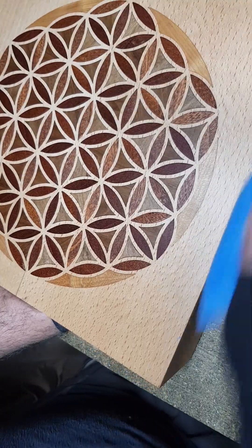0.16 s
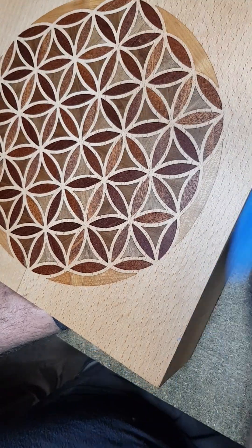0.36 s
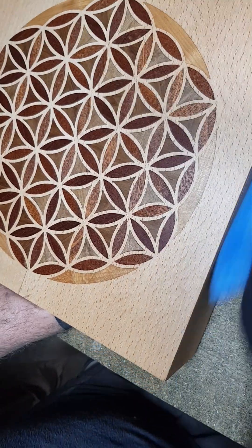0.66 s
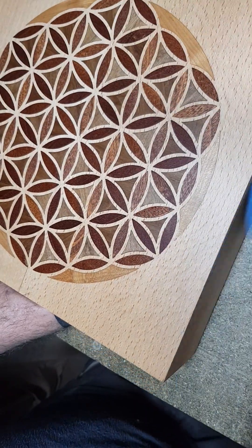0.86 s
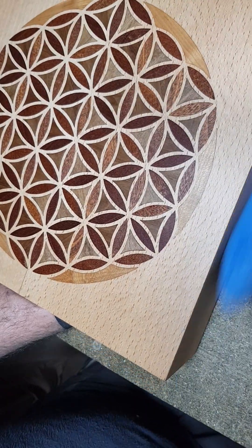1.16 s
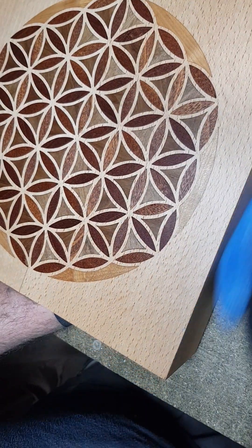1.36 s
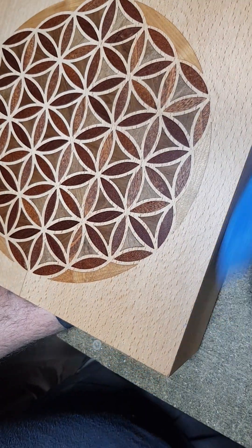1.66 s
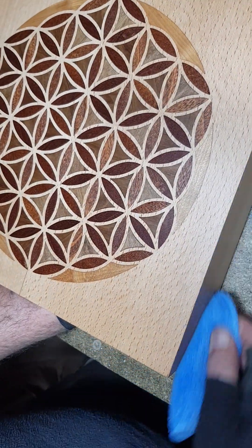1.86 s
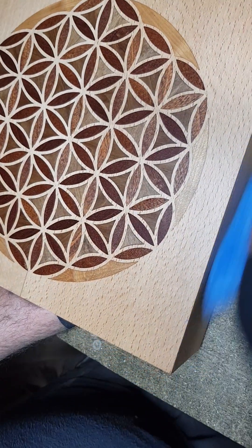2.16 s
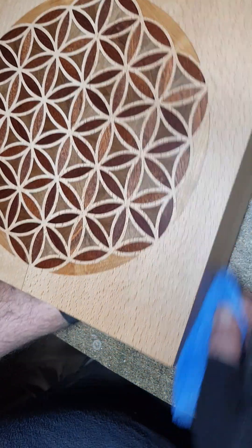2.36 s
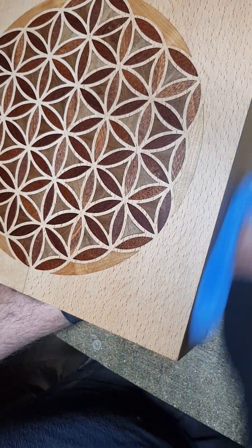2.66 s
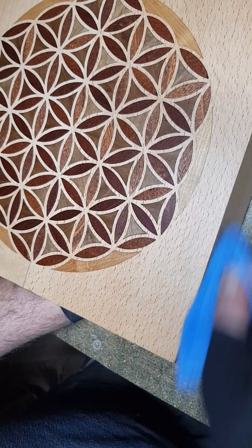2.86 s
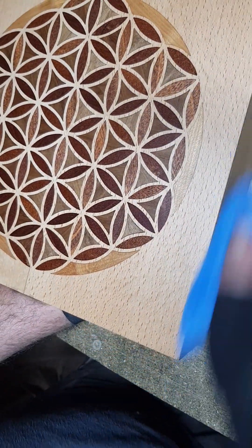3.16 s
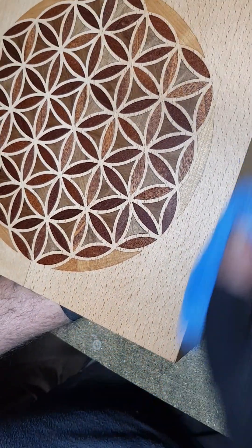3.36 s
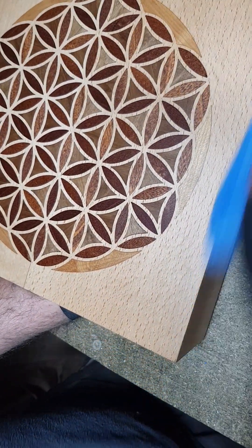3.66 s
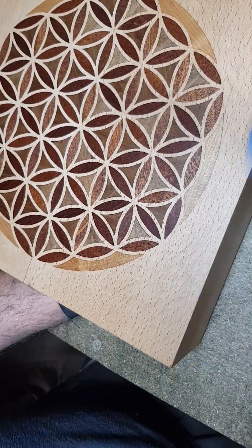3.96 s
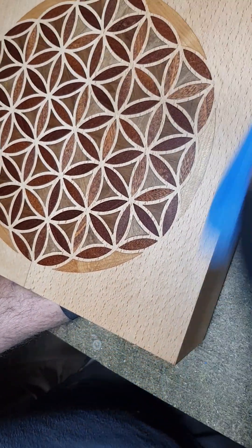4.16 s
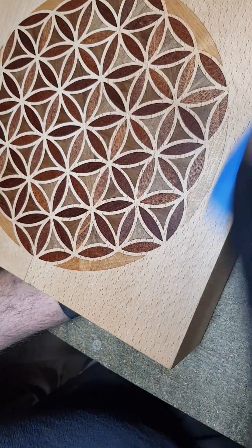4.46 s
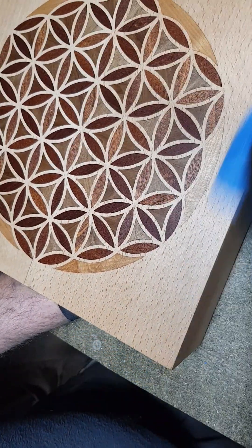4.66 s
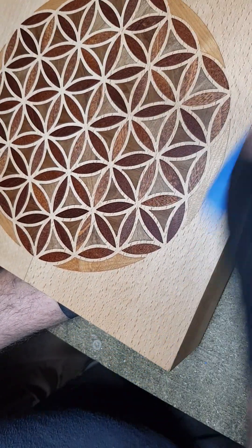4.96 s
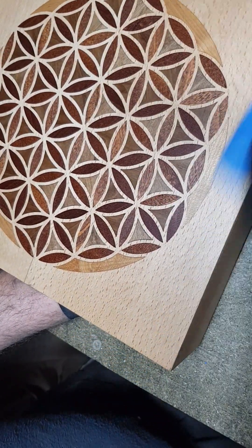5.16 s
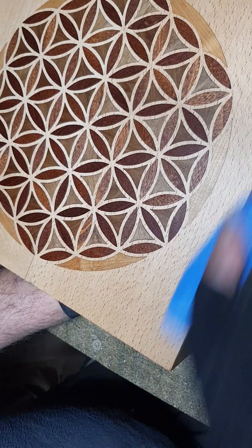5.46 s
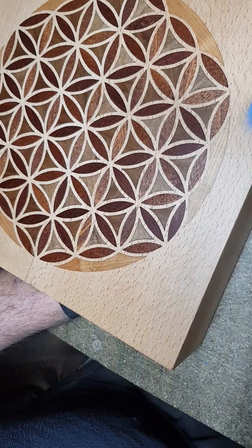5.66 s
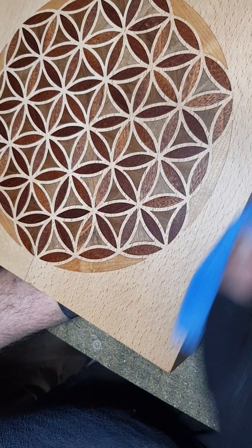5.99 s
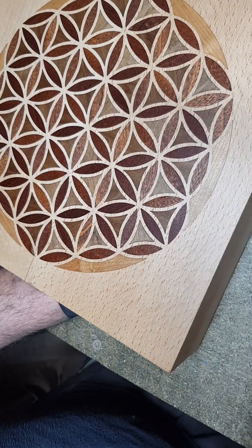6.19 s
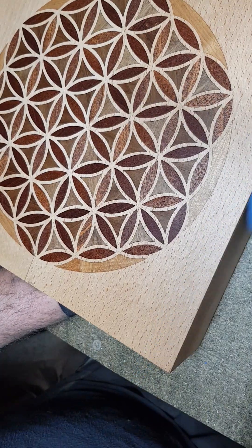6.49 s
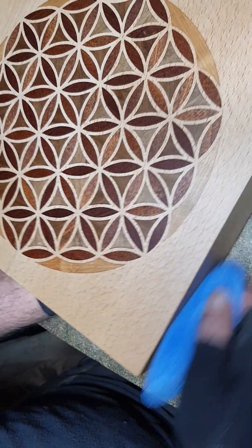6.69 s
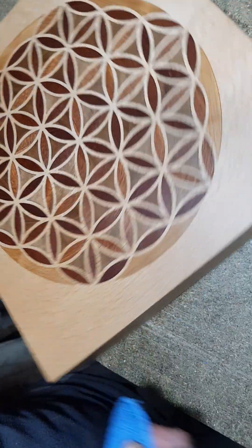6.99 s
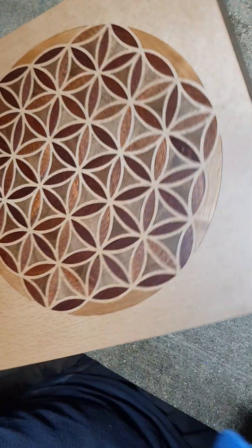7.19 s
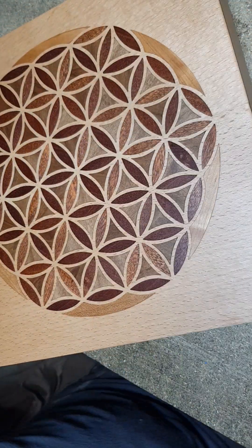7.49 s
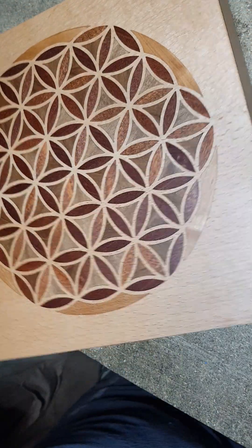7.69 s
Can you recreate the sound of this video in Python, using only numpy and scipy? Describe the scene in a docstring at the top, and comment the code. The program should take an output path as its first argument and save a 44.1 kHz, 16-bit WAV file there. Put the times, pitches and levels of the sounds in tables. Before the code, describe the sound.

Close, dry rubbing of fabric on wood, about four quick strokes a second, the box bumping lightly before dragging round on its support.

```python
"""A cloth hisses back and forth along the oiled side of a hand-held wooden box, about four strokes a second.
The hiss is dense random friction slips; the wood murmurs under it, as slips ringing panel modes.
The box bumps on its support as short push-and-rebound pulses, with clacks that ring the panels.
Thin whistles come and go; at the end coarser slips drag the box round with a dull scrape.
A small, dry workshop adds sparse reflections; the microphones are close."""
import sys
import numpy as np
from scipy import signal
from scipy.fft import rfft, irfft, next_fast_len
from scipy.io import wavfile
from scipy.ndimage import uniform_filter1d

SR = 44100
rng = np.random.default_rng(int(sys.argv[2]) if len(sys.argv) > 2 else 0)


def master(y):
    """Save y as 16-bit WAV."""
    cut = np.clip(np.atleast_2d(y).T, -1, 1)
    pcm = np.round(cut * 32767)  # scale
    wavfile.write(sys.argv[1], SR, pcm.astype(np.int16))


N = 345479
TIME = np.arange(N) / SR


def amp(db):
    """Decibels to gain."""
    return 10 ** (np.asarray(db) / 20)


def unit(x):
    """Scales to rms 1."""
    return x / np.sqrt(np.mean(x ** 2) + 1e-20)


def curve(rows, axis=1):
    """One column of a table, joined by straight lines in time."""
    rows = np.array(rows)
    return np.interp(TIME, rows[:, 0], rows[:, axis])


def at_hz(points, hz):
    """Reads a table on a log-frequency axis."""
    table_hz, value = np.transpose(points)
    return np.interp(np.log(hz + 1), np.log(table_hz), value)


def colour(x, points):
    """Gives x a spectrum, at rms 1."""
    size = next_fast_len(N)
    gain = amp(at_hz(points, np.fft.rfftfreq(size, 1 / SR)))
    return unit(irfft(rfft(x, size) * gain, size)[..., :N])


def butter(x, order, cutoff_hz, kind="low"):
    """Butterworth filter."""
    return signal.sosfilt(signal.butter(order, cutoff_hz, kind, fs=SR, output="sos"), x)


def wander(rate_hz):
    """Smooth random drift of rms 1."""
    lowpass = np.exp(-(np.fft.rfftfreq(N, 1 / SR) / rate_hz) ** 2)
    return unit(irfft(rfft(rng.standard_normal(N)) * lowpass, N))


def swell(s, rise_s, fall_s):
    """A smooth rise and fall around one moment."""
    width_s = np.where(TIME < s, rise_s, fall_s)
    return np.exp(-.5 * ((TIME - s) / width_s) ** 2)


def slips(per_s, spread_db):
    """Tiny releases of friction, random in time, sign and size; rms 1."""
    size = amp(spread_db * np.minimum(rng.exponential(1, N), 4.5))
    happens = rng.random(N) < per_s / SR
    return unit(rng.standard_normal(N) * size * happens)


def pair(make, same):
    """Two microphones share part of a source; same is the shared power fraction."""
    same = np.clip(same, 0, 1)
    shared = make()
    separate = np.array([make(), make()])
    return np.sqrt(same) * shared + np.sqrt(1 - same) * separate


def noise():
    """White noise."""
    return rng.standard_normal(N)


def through(x, response):
    """Convolves each channel with its response."""
    return signal.fftconvolve(np.atleast_2d(x), np.atleast_2d(response), axes=1)[:, :N]


def ring(modes, skew=0):
    """Impulse response of decaying modes, energy 1; skew turns the phase of the higher ones."""
    t = np.arange(SR // 3) / SR
    h = np.zeros(len(t))
    for k, (hz, db, t60) in enumerate(modes):
        phase = skew * k * (-1) ** k
        h += amp(db - 60 * t / t60) * np.sin(2 * np.pi * hz * t + phase)
    return h / np.linalg.norm(h)


def mottle(x, patch_db):
    """The contact patch keeps changing shape, so neighbouring bands swell and fade."""
    z = signal.stft(x, SR, nperseg=1024)[2]
    patches = rng.standard_normal(z.shape[1:])
    for axis in (0, 1):
        patches = uniform_filter1d(patches, size=7, axis=axis)
    return unit(signal.istft(z * amp(patch_db * unit(patches)), SR, nperseg=1024)[1][:, :N])


# room air spectrum: freq_hz, relative_db
AIR_SPECTRUM = [(20, -18), (80, -2), (300, -27), (1400, -29.5), (16000, -57.5)]


def room_air():
    """Faint room rumble: shaped noise, nearly identical in both microphones."""
    return amp(-53.0) * colour(pair(noise, 0.95), AIR_SPECTRUM)


# workshop reverberation: freq_hz, t60_s
ROOM_DECAY = [(100, 0.088), (1000, 0.075), (15000, 0.029)]


def workshop(x):
    """Sparse reflections, different on each side, the treble dying first."""
    taps = rng.standard_normal((2, SR // 2)) * (rng.random((2, SR // 2)) < 2500 / SR)
    taps[:, :SR // 250] = 0  # 4 ms before the first reflection
    hz, t, z = signal.stft(taps, SR, nperseg=256)
    decay_db = -60 * t / at_hz(ROOM_DECAY, hz)[:, None]
    tail = signal.istft(z * amp(decay_db), SR, nperseg=256)[1]
    return through(x, tail / np.linalg.norm(tail[0]))


# box sway modes on the support: freq_hz, relative_db, t60_s
SWAY_MODES = [(85, 2.5, 0.61), (126.2, 8, 0.23), (258.6, 4.5, 0.092), (327, -8, 0.033)]


def sway(x):
    """The whole box rocks on its support."""
    return through(x, ring(SWAY_MODES))


# wooden panel modes: freq_hz, relative_db, t60_s
WOOD_MODES = [(450, 1, 0.15), (564, 8, 0.023), (682, 12.5, 0.018), (998, 9, 0.013), (1196, -2, 0.051),
              (1527, 6, 0.031), (1680, 9, 0.021), (1908, 8.5, 0.02), (2325, 8, 0.03), (2804, 10.5, 0.021),
              (3466, 11.5, 0.012)]


def ring_panels(x):
    """The wood rings; each microphone sees its higher modes from another angle."""
    return through(x, [ring(WOOD_MODES, skew=-0.18), ring(WOOD_MODES, skew=0.1)])


# drag force of the box on its support: time_s, relative_db
DRAG_FORCE = [(6.5, -74), (6.63, -45.5), (6.77, -42), (6.85, -37), (7.01, -35.5), (7.08, -30), (7.2, -31.5),
              (7.35, -48), (7.68, -52), (7.825, -32)]


def drag_force():
    """How hard the box scrapes over its support; zero before the first row."""
    return amp(curve(DRAG_FORCE)) * (TIME > DRAG_FORCE[0][0])


# low friction rumble, used by drag and groans: freq_hz, relative_db
GROAN_SPECTRUM = [(35, -14), (85, 12), (290, 7.5), (380, -14.5), (700, -2), (2000, -52)]
# scrape of box on support: freq_hz, relative_db
SCRAPE_SPECTRUM = [(150, -24), (300, 5.5), (690, -2), (860, -9.5), (1200, 1.5), (1600, -0.5), (2050, -7.5),
                   (4500, -24.5), (9000, -39)]


def drag():
    """Box scrapes over its support in coarse slips; ring, rumble and scratch grow as its weight bears down."""
    level = drag_force()
    weight = level / level.max()
    judder = pair(lambda: slips(2200, 1.1), 0.49)
    scrape = colour(judder, SCRAPE_SPECTRUM) + amp(1.5) * np.sqrt(weight) * unit(ring_panels(judder))
    scratch = unit(butter(judder, 2, [2600, 5600], "bandpass"))
    rumble = colour(pair(lambda: slips(900, 0.58), 1.0), GROAN_SPECTRUM)
    sliding = level * (amp(-5.5) * scrape + amp(-16.5) * weight * scratch)
    return (sliding + amp(-29.5) * weight ** 1.23 * rumble) * amp([[.9], [-.9]])


# bumps on the support: time_s, thud_relative_db, thud_pitch_hz, clack_relative_db
BUMP_EVENTS = [(0.091, -28, 182, -61), (0.48, -29, 168, -36), (0.536, -31.5, 318, -53),
               (0.57, -28.5, 147, -61), (0.821, -32, 142, -67), (1.025, -31, 150, -57),
               (1.061, -31, 119, -70), (1.548, -36, 302, -36), (1.611, -33, 160, -49),
               (1.717, -37, 278, -39), (1.902, -36.5, 283, -51), (2.091, -25.5, 143, -44),
               (2.143, -27.5, 133, -60), (2.414, -28.5, 280, -31.5), (2.464, -30.5, 169, -54),
               (2.603, -32.5, 285, -56), (2.838, -35.5, 252, -44), (2.889, -34.5, 234, -45),
               (3.072, -24.5, 380, -30), (3.077, -26.5, 268, -42), (3.601, -28.5, 183, -42),
               (3.858, -26, 116, -40), (4.112, -35, 143, -41), (4.218, -34, 300, -48),
               (4.373, -29.5, 127, -35), (4.607, -35, 240, -39), (4.742, -34, 250, -57),
               (4.884, -30.5, 105, -45), (4.913, -28.5, 200, -60), (5.114, -29, 483, -29),
               (5.149, -30.5, 106, -64), (5.262, -33, 260, -47), (5.448, -33, 210, -52),
               (5.666, -29.5, 186, -42), (5.818, -34, 255, -58), (5.965, -28, 151, -44),
               (6.579, -32, 238, -33.5), (6.584, -23, 162, -61), (7.513, -34.5, 91.5, -62),
               (7.612, -27, 124, -64), (7.824, -18.5, 203, -50)]


def chatter(body_db=-17):
    """After each bump the box shuffles on its support, which gives the thud a woody body."""
    shuffles = [amp(thud_db) * swell(s, 0.005, 0.028) for s, thud_db, hz, clack_db in BUMP_EVENTS]
    body_spectrum = [(60, -23), (140, -1), (290, 5), (380, -7), (700, -11), (1500, -17.5), (5000, -48)]
    body = colour(pair(lambda: slips(3000, 0.59), 0.8), body_spectrum)
    return amp(body_db) * np.max(shuffles, axis=0) * body * amp([[2], [-2]])


def bumps(rattle_s=0.013):
    """Each bump is one push and rebound that sets the box swaying; bare wood adds a short clack."""
    thuds, clacks = np.zeros(N), np.zeros(N)
    t = np.arange(SR // 20) / SR
    fade = np.exp(-t / rattle_s)
    for s, thud_db, hz, clack_db in BUMP_EVENTS:
        start = round(s * SR)
        span = slice(max(start - len(t), 0), start + len(t))
        u = np.pi * hz * (TIME[span] - s)
        thuds[span] += amp(thud_db) * (1 - 2 * u ** 2) * np.exp(-u ** 2)
        # the contact chatters for a few milliseconds: random phases, flat spectrum
        phase = np.angle(rfft(fade * rng.standard_normal(len(t))))
        contact = fade * irfft(np.exp(1j * phase), len(t))
        # the slower the push, the duller its clack
        contact = butter(contact / np.linalg.norm(contact), 2, 7.7 * hz)
        part = clacks[start:][:len(t)]
        part += amp(clack_db) * contact[:len(part)]
    low = amp(3.0) * thuds + amp(-19.0) * sway(thuds)
    crack = butter(clacks, 2, [350, 2000], "bandpass")
    wooden = ring_panels(clacks) + amp(-5) * crack
    return low * amp([[1.2], [-1.2]]) + amp(25.5) * wooden


# cloth strokes, push and pull by turns: turn_time_s, turn_hiss_db, sliding_hiss_db
STROKE_TURNS = [(-0.14, -45, -44), (0.093, -53, -46), (0.315, -54, -45), (0.569, -53.5, -46.5),
                (0.811, -57.5, -47), (1.056, -57, -46), (1.334, -59.5, -44.5), (1.605, -53.5, -43.5),
                (1.9, -61, -43.5), (2.137, -54.5, -44.5), (2.359, -57.5, -44), (2.62, -53, -45),
                (2.844, -53, -44), (3.097, -52.5, -44.5), (3.317, -51.5, -44), (3.6, -56.5, -45.5),
                (3.851, -50, -45), (4.106, -53.5, -46), (4.356, -50, -45), (4.639, -54.5, -47),
                (4.876, -54, -45), (5.145, -56.5, -45.5), (5.413, -53.5, -45), (5.693, -55, -46.5),
                (5.955, -52.5, -46.5), (6.28, -56, -47), (7.34, -51, -52), (8.1, -5, -50)]
TURNS_S, TURN_DB, SLIDE_DB = np.transpose(STROKE_TURNS)
BRISK_S = 0.24  # a stroke longer than this turns gently
PACE = np.minimum(BRISK_S / np.diff(TURNS_S, append=np.inf), 1)


def stroke_motion(bite=0.16, ease=0.33, rest=0.046):
    """Stroke number, progress and speed: the hand halts at each turn, speeds up quickly, slows more gently."""
    # bite, ease and rest are fractions of a stroke
    place = np.interp(TIME, TURNS_S, np.arange(len(TURNS_S)))
    k = place.astype(int)
    u = place - k
    rise = np.sin(np.pi / 2 * np.clip((u - rest) / bite, 0, 1))
    fall = np.sin(np.pi / 2 * np.clip((1 - u - rest) / ease, 0, 1)) ** 0.85
    return k, u, rise * fall


def turn_swell(lead_s, width_s, groan_db=-46, follow=1.0):
    """Friction swells around each turn: stronger when the hand is brisk and the cloth rubs on through it."""
    sizes = amp(groan_db + follow * (TURN_DB - np.median(TURN_DB))) * PACE ** 0.72
    return sum(size * swell(s - lead_s, width_s, width_s) for s, size in zip(TURNS_S, sizes))


def resonance(hz, width_hz):
    """Friction noise rings one resonance, steady or gliding; width_hz is that of each of two poles."""
    carrier = np.exp(2j * np.pi * np.cumsum(hz * np.ones(N)) / SR)
    r = np.exp(-np.pi * width_hz / SR)
    z = pair(noise, 0.064) / carrier
    for _ in range(2):
        z = signal.lfilter([1 - r], [1, -r], z)
    steadied = z / np.sqrt(abs(z))  # steady rubbing evens out the swings
    return unit((steadied * carrier).real)


# whistles of the air pocket under the cupped cloth: centre_s, length_s, pitch_hz, pole_width_hz, level_db
POCKET_WHISTLES = [(0.658, 0.044, 1800, 480, -44.5), (1.67, 0.25, 1825, 95, -50),
                   (2.278, 0.072, 1800, 170, -47.5), (4.49, 0.35, 1754, 161, -53.5),
                   (5.3, 0.13, 1720, 140, -56), (7.452, 0.045, 1960, 230, -48), (7.69, 0.13, 1750, 70, -49)]
WHISTLE_SAG_HZ_PER_S = 140
# panels singing as the hand passes over: nearest_s, approach_s, leaving_s, pitch_hz, relative_db
SINGING_PANELS = [(2.26, 0.73, 1, 986, -61), (5.24, 0.043, 0.35, 560, -49), (4.7, 0.43, 0.22, 548, -52.5)]


def hollow():
    """The air pocket under the hand whistles on through the turns; nearby panels sing most as the cloth slides."""
    whistles = 0
    for s, length_s, hz, width_hz, db in POCKET_WHISTLES:
        falling_hz = hz - WHISTLE_SAG_HZ_PER_S * (TIME - s)
        whistles = whistles + amp(db) * swell(s, length_s, length_s) * resonance(falling_hz, width_hz)
    singing = 0
    for s, rise_s, fall_s, hz, db in SINGING_PANELS:
        singing = singing + amp(db) * swell(s, rise_s, fall_s) * resonance(hz, width_hz=130)
    speed = stroke_motion()[2]
    return whistles + (1 + speed) / 2 * singing


def groans():
    """The slowing cloth sticks and scuffs the panels; as the hand reverses, the whole box shudders."""
    judder = pair(lambda: slips(1100, 0.98), 1.0)
    rumble = mottle(colour(judder, GROAN_SPECTRUM), patch_db=4.5)
    shudder = turn_swell(lead_s=-0.0045, width_s=0.058) * rumble
    grip = turn_swell(lead_s=0.017, width_s=0.035)
    friction = colour(pair(lambda: slips(2500, 0.85), 0.54), [(600, -6.5), (3000, -12.0)])
    scuff = unit(ring_panels(friction))
    # only a hard grip makes the wood bark
    bark = (grip / grip.max()) ** 2.33 * scuff
    return amp(2.5) * shudder * amp([[1.2], [-1.2]]) + amp(-36.0) * bark


# cloth pressure on the wood, as murmur drive: time_s, relative_db
CLOTH_PRESSURE = [(0, -55), (1.15, -49.5), (1.45, -45), (2.25, -46.5), (2.9, -52.5), (3.7, -59),
                  (4.9, -55.5), (5.07, -76), (5.19, -52.5), (5.8, -57.5), (6.5, -54), (7.0, -47),
                  (7.8, -59.5)]
PUSH_EASE_DB = 5  # pressure drop over a push


def rub_force():
    """The drive on the wood is speed times pressure; the hand eases off along each push."""
    k, u, speed = stroke_motion()
    return speed * amp(curve(CLOTH_PRESSURE) - PUSH_EASE_DB * (k % 2 == 0) * u)


def box_rub():
    """Sliding friction drives the panels, and the grip shakes the whole box a little."""
    friction = pair(lambda: slips(8000, 2.0), 0.12)
    direct = colour(friction[::-1], [(300, 5.0), (1000, 28.0), (1700, 17.5), (3500, -55.0)])
    murmur = mottle(unit(ring_panels(friction)) + direct, patch_db=2.3)
    shake = unit(sway(pair(lambda: slips(900, 1.0), 1.0)))
    return amp(2.0) * rub_force() * murmur + amp(-60) * shake


def stroke_level(push_fade_db=6.0, drag_hiss_db=-21):
    """Hiss in dB: pushes start hard and fade, pulls stay even, turns leave gaps, dragging adds its own."""
    k, u, speed = stroke_motion()
    sliding_db = SLIDE_DB[k] - push_fade_db * (k % 2 == 0) * (u - .5)
    level = speed * amp(sliding_db) + (1 - speed) * amp(curve(STROKE_TURNS))
    return 20 * np.log10(np.hypot(level, amp(drag_hiss_db) * drag_force()))


def slow_wipe(from_s=6.5, over_s=0.42):
    """Goes from 0 to 1 as the brisk wiping gives way to one slow wipe."""
    return np.clip((TIME - from_s) / over_s, 0, 1)


# cloth fibre hiss: freq_hz, relative_db
FIBRE_SPECTRUM = [(400, -16.5), (1000, -9), (3200, 1), (4600, -0.5), (6300, -5), (7200, -11), (8200, -12.5),
                  (9600, -10), (11500, -7.5), (16000, -13.5)]


def cloth():
    """Thousands of fibres catch and let go as they slide over the wood."""
    level_db = stroke_level()
    near = slips(2500, 0.57)
    # the nearest fibres reach the left side first, by 18 samples
    near_pair = np.array([near, np.roll(near, shift=18)])
    fibres = np.array([slips(16000, 1.0) for _ in range(2)]) + 0.3 * near_pair
    hiss = mottle(colour(fibres, FIBRE_SPECTRUM), patch_db=1.8) * amp(level_db)
    # a slow cloth sounds duller than a fast one, and duller again in the last slow wipe
    dull = butter(hiss, 1, 5000)
    sheen_db = np.clip(.5 * (level_db + 48.5), -6, 2) + wander(16) - 6 * slow_wipe()
    return (dull + (hiss - dull) * amp(sheen_db)) * amp([[.5], [-.5]])


def scene():
    """Cloth and box close by, over the faint rumble of the room."""
    hiss = cloth()
    wood = box_rub() + groans() + hollow() + drag() + bumps() + chatter()
    radiated = butter(wood, 2, 300, "highpass")  # a small box sends little bass into the room
    echo = workshop(amp(-14) * (hiss + radiated))
    return hiss + wood + echo + room_air()


def record(dry, edge_hz=15850):
    """The recorder sheds the deepest bass and the highest treble."""
    lean = butter(dry, 2, 35, "highpass")
    treble_cut = signal.firwin(601, edge_hz, window=("kaiser", 9), fs=SR)
    return signal.oaconvolve(lean, treble_cut[None], "same")


dry = scene()
out = record(dry)
master(out)
```